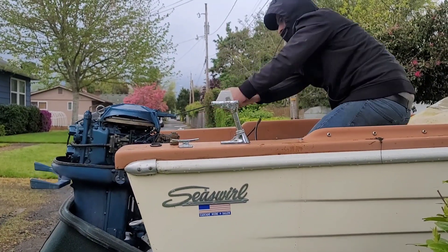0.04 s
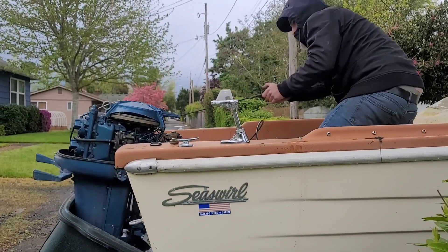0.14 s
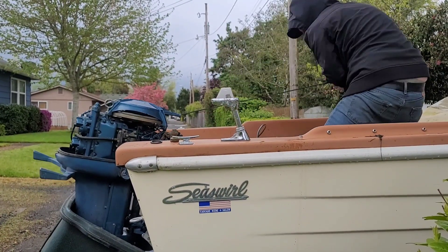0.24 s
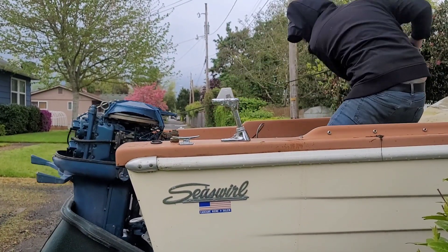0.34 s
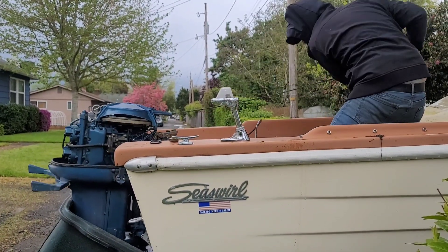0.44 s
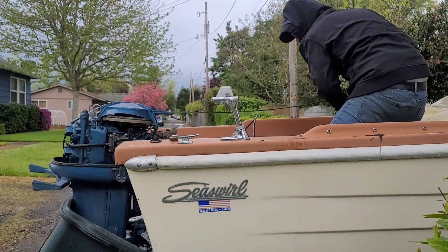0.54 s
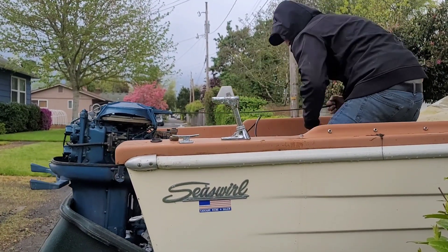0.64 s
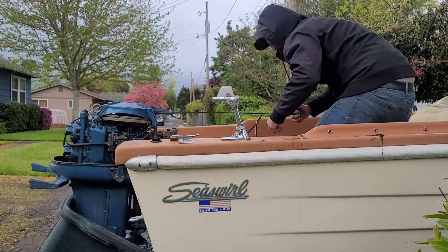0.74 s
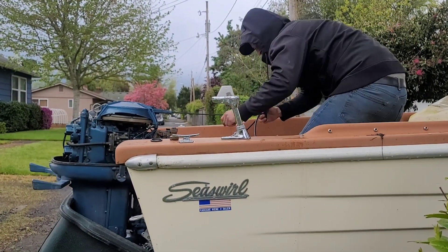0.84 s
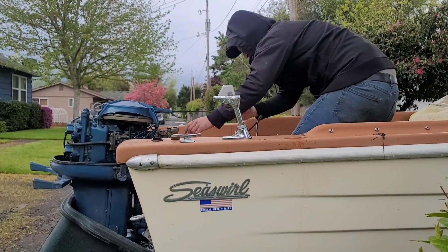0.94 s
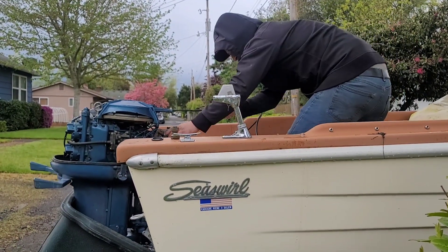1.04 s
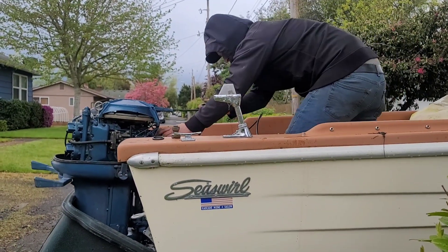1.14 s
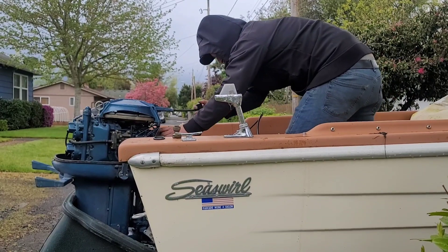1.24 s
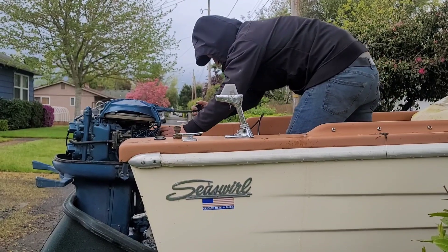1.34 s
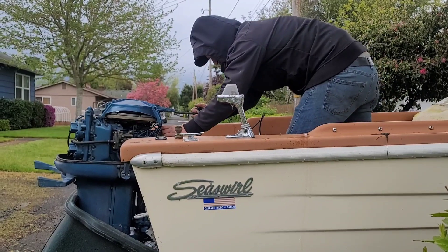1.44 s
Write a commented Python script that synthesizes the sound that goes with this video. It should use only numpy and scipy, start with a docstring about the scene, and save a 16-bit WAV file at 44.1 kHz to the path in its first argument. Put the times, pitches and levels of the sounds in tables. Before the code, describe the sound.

Faint bird chirps over a low outdoor hum open the moment. At about 0.2 s an outboard motor's starter cord is yanked: a harsh metallic rasp peaks near 0.28 s with a deep cylinder puff. Sharp clacks and hollow casing knocks follow as the cord winds back around 0.5 s, thinning to separate clacks at 0.72, 0.86 and 1.02 s. Light ticks and faint chirps remain until 1.5 s; it never fires.

```python
"""Faint bird chirps over a low hum in a quiet garden, then one starter-cord pull on an old outboard motor
that does not fire. The cord rasps out and winds back: dense random slips ringing the metal housing.
Metal clacks are noise bursts through that housing; clicks ring the hollow casing as knocks and rattle.
The cylinder gives one strong deep puff and weaker ones: swelling sines over low churning noise."""
import sys
import numpy as np
from scipy import signal
from scipy.fft import rfft, irfft, next_fast_len
from scipy.io import wavfile

SR = 44100
rng = np.random.default_rng(int(sys.argv[2]) if len(sys.argv) > 2 else 0)


def unload_audio(sound):
    """Save the sound as a 16-bit wav file, at the path given as the first command line argument."""
    columns = np.transpose(np.atleast_2d(sound))
    # keep every value between -1 and 1, then stretch to whole-number steps
    steps = np.round(np.clip(columns, -1, 1) * 32767)
    wavfile.write(sys.argv[1], SR, steps.astype(np.int16))


N = 66150
T = np.arange(N) / SR
SIZE = next_fast_len(N + SR // 2)
HZ = np.maximum(np.arange(SIZE // 2 + 1) * SR / SIZE, 1)


def from_db(db):
    """Decibels to gain."""
    return 10 ** (np.asarray(db) / 20)


def rms_one(x):
    """Scale to unit power."""
    return x / np.sqrt(np.mean(x ** 2) + 1e-20)


def level(rows):
    """Gain over time from (time_s, level_db) rows, silent outside them."""
    time_s, level_db = np.transpose(rows)
    return from_db(np.interp(T, time_s, level_db, left=-np.inf, right=-np.inf))


def at_hz(points):
    """Read (freq_hz, value) rows on a log-frequency axis."""
    freq_hz, value = np.transpose(points)
    return np.interp(np.log(HZ), np.log(freq_hz), value)


def shape(x, gain):
    """Apply a frequency response."""
    return irfft(rfft(x, SIZE) * gain, SIZE)[..., :N]


def drift(corner_hz):
    """Smooth random wander of rms 1, its amplitude spectrum halved at the corner."""
    return rms_one(shape(rng.standard_normal(N), 1 / (1 + (HZ / corner_hz) ** 2)))


# left-right correlation: [freq_hz, likeness (-1..1)], negative values count as 0
LEFT_RIGHT_LIKENESS = [(100, 0.7734), (700, -0.13), (1500, 0.36), (4000, 0.7), (12000, 0.62)]


def pair(white, colour_db):
    """Two unrelated signals become coloured stereo, its likeness set by frequency; rms 1."""
    alike = np.clip(at_hz(LEFT_RIGHT_LIKENESS), 0, 1)
    mid, side = shape(white, from_db(colour_db) * np.sqrt([1 + alike, 1 - alike]))
    return rms_one(np.array([mid + side, mid - side]))


def noise(colour_db):
    """Coloured stereo noise, rms 1."""
    return pair(rng.standard_normal((2, N)), colour_db)


def burst(start_s, rise_s, t60_s):
    """Straight rise, then exponential decay."""
    rise = np.clip((T - start_s) / rise_s, 0, 1)
    decay_time_s = np.maximum(T - start_s - rise_s, 0)
    return rise * from_db(-60 * decay_time_s / t60_s)


def tone_from(start_s, pitch_hz):
    """Sine with zero phase at its start."""
    return np.sin(2 * np.pi * pitch_hz * (T - start_s))


def ring(x, mode_hz, t60_s):
    """Two-pole resonator: a unit click rings a decaying sine of height 1."""
    r, w = from_db(-60 / (t60_s * SR)), 2 * np.pi * mode_hz / SR
    return signal.lfilter([0, np.sin(w)], [1, -2 * r * np.cos(w), r * r], x + 1e-18)


def grains(rate_per_s):
    """Two trains of tiny slips of uneven size, at shared random times."""
    hits = rng.random(N) < rate_per_s / SR
    size_db = 2 * np.minimum(rng.exponential(1, N), 4)
    return hits * from_db(size_db) * rng.standard_normal((2, N))


def from_left(x, lead_rad, balance_db):
    """Left leads right by a phase and differs in level (left minus right), mean power kept."""
    gains = from_db([balance_db / 2, -balance_db / 2])
    gains = gains / np.sqrt(np.mean(gains ** 2, axis=0))
    return shape(x, gains * np.exp(-1j * np.array([0 * lead_rad, lead_rad])))


def echoes(x, delay_s, t60_s):
    """Dense dying reflections, thin in the bass and different on each side."""
    response = rms_one(rng.standard_normal((2, N)) * burst(delay_s, delay_s, t60_s)) / np.sqrt(N)
    return shape(x, rfft(response, SIZE) * HZ / np.hypot(HZ, 900))


# far-off drone partials: [pitch_hz, level_db (rms)]
DRONE_PARTIALS = [(83, -49.5), (133, -55), (168, -57)]
# outdoor air spectrum: [freq_hz, density_db (relative, per Hz)]
AIR_SPECTRUM = [(15, -18), (30, -3.5), (65, 6.5), (100, 1.5), (160, -13.5), (230, -18), (370, -14),
                (500, -22.5), (780, -17.5), (1000, -31), (1500, -25), (2300, -33), (4000, -33.5),
                (5000, -47), (7500, -49), (9000, -58), (15000, -59)]
AIR_DB = -42.5


def garden():
    """Still outdoor air as coloured noise, with a far-off drone of sines wavering in pitch."""
    hum = 0
    for pitch_hz, level_db in DRONE_PARTIALS:
        wavering_hz = pitch_hz + 4 * drift(16)
        hum = hum + from_db(level_db) * np.sqrt(2) * np.sin(2 * np.pi * np.cumsum(wavering_hz) / SR)
    return hum + from_db(AIR_DB) * noise(at_hz(AIR_SPECTRUM))


# bird chirps: [start_s, length_s, level_db (relative), start_hz, middle_hz, end_hz]
BIRD_CHIRPS = [(0, .04, -60, 3100, 3170, 3050), (.032, .052, -57, 3750, 4000, 3980),
               (.085, .04, -51, 2350, 2600, 2900), (.113, .05, -45, 2800, 3000, 3100),
               (.134, .018, -48, 3400, 3520, 3400), (1.274, .038, -51, 2600, 3350, 3050),
               (1.305, .07, -57, 3000, 2950, 2950), (1.448, .06, -51, 3450, 4100, 4100)]
BIRD_DB, BIRD_FLUTTER_DB, BIRD_WARBLE_HZ = 0.5, 4, 49.7
BIRD_LEAD_S, BIRD_LEFT_DB = 0.0002, 5.5
BIRD_ECHO_DB, BIRD_ECHO_DELAY_S, BIRD_ECHO_T60_S = -14, 0.0033, 0.39


def birds():
    """Thin gliding whistles, fluttering in level and pitch, scattered by trees and houses."""
    song = 0
    for start_s, length_s, level_db, start_hz, middle_hz, end_hz in BIRD_CHIRPS:
        progress = np.clip((T - start_s) / length_s, 0, 1)
        pitch_hz = np.interp(progress, [0, .5, 1], [start_hz, middle_hz, end_hz])
        pitch_hz = pitch_hz + BIRD_WARBLE_HZ * drift(150)
        gain = from_db(level_db + BIRD_DB + BIRD_FLUTTER_DB * drift(90))
        arch = np.sqrt(np.abs(np.sin(np.pi * progress)))
        song = song + gain * arch * np.sin(2 * np.pi * np.cumsum(pitch_hz) / SR)
    direct = from_left(song, 2 * np.pi * HZ * BIRD_LEAD_S, np.full_like(HZ, BIRD_LEFT_DB))
    return direct + from_db(BIRD_ECHO_DB) * echoes(song, BIRD_ECHO_DELAY_S, BIRD_ECHO_T60_S)


# light ticks of the handle and cord: [start_s, level_db (relative), centre_hz]
HANDLE_TICKS = [(1.108, -36.5, 7700), (1.142, -38.5, 4450), (1.164, -40.5, 8400), (1.182, -43.5, 10900),
                (1.199, -40.5, 7400), (1.247, -47, 12000), (1.2247, -32, 2550), (1.227, -43.5, 5840),
                (1.274, -48, 3930), (1.281, -51, 9000), (1.318, -50, 12200), (1.343, -47, 6940),
                (1.3814, -32, 3100), (1.383, -50, 7960), (1.397, -69, 3180), (1.413, -49, 8100)]
TICK_RISE_S, TICK_T60_S, TICK_HALF_WIDTH_OCTAVES = 0.0013, 0.028, 0.54


def ticks():
    """Small dry noise bursts, each with its own spectral peak."""
    out = 0
    for start_s, level_db, centre_hz in HANDLE_TICKS:
        distance = np.log2(HZ / centre_hz) / TICK_HALF_WIDTH_OCTAVES
        tick = noise(-20 * np.log10(1 + distance ** 2))
        out = out + from_db(level_db) * burst(start_s, TICK_RISE_S, TICK_T60_S) * tick
    return out


# churning of the turning motor: [time_s, level_db (relative)]
CHURN_LEVEL = [(.12, -82), (.18, -51), (.23, -39), (.265, -26), (.335, -23), (.41, -34), (.452, -22.5),
               (.49, -33.5), (.56, -26.5), (.63, -31), (.74, -33), (.9, -40.5), (1.1, -65), (1.4, -60.5)]
# its spectrum: [freq_hz, density_db (relative, per Hz)]
CHURN_SPECTRUM = [(20, -1), (40, -9), (70, 6.5), (115, -0.5), (160, 0), (205, -6), (260, 3), (335, 2),
                  (410, -4), (520, -17), (900, -11), (3000, -62)]
# puffs of the cylinder: [start_s, level_db (relative), pitch_hz, rise_s, t60_s]
CYLINDER_PUFFS = [(0.281, -4, 80, .020, 0.052), (.328, -11.5, 77.6, 0.018, 0.04),
                  (0.495, -20.5, 71, 0.017, 0.058), (0.551, -21, 122.5, 0.0089, 0.036),
                  (0.661, -21, 59, 0.018, .12), (0.783, -27, 79, 0.016, 0.21),
                  (.92, -30, 71.3, 0.013, 0.083)]


def cylinder():
    """Deep puffs of pumped air, as swelling and dying sines, over low churning noise."""
    puffs = 0
    for start_s, level_db, pitch_hz, rise_s, t60_s in CYLINDER_PUFFS:
        puff = burst(start_s, rise_s, t60_s) * tone_from(start_s, pitch_hz)
        puffs = puffs + from_db(level_db) * puff
    return puffs + level(CHURN_LEVEL) * noise(at_hz(CHURN_SPECTRUM))


# modes of the hollow casing: [mode_hz, level_db (relative), t60_s]
CASING_MODES = [(597.5, -14, 0.16), (631, -5, 0.096), (668, -4.5, 0.054), (720.7, 0, 0.066),
                (753, -4.5, 0.053), (793.6, -2.5, 0.058), (855, -16, 0.047), (1134, -8, 0.065),
                (1320, -5, 0.024), (1600, 0, 0.035)]
# loose rattle: [time_s, level_db (relative)]
RATTLE_LEVEL = [(.17, -47.5), (.21, -24.5), (.28, -26), (.40, -20), (.5, -28), (.54, -31.5), (.63, -34.5),
                (.675, -27.5), (.71, -34.5), (.76, -30), (.95, -35.5), (1.08, -42), (1.14, -56.5),
                (1.3, -72.5)]
# knocks of the rocking motor: [start_s, level_db (relative), strongest_pitch_hz]
MOTOR_KNOCKS = [(.061, -37.5, 715), (.098, -46, 806), (.198, -24, 730), (.215, -14.5, 732),
                (.228, -8.5, 730), (.250, -8, 728), (.310, -28, 690), (.343, -14.5, 720), (.361, -12, 730),
                (.384, -8.5, 717), (.400, -13, 685), (.420, -12, 697), (.436, -39, 700), (.451, -13, 695),
                (.547, -17.5, 651), (.593, -19, 697), (.606, -44, 710), (.6465, -17.5, 651),
                (.724, -18, 773), (.746, -14, 669), (.770, -31, 716), (.797, -17.5, 740), (.848, -35, 700),
                (.862, -20, 747), (.926, -13.5, 743), (.965, -20.5, 758), (1.028, -12, 661.5),
                (1.088, -26.5, 710), (1.151, -29, 754), (1.176, -36.5, 740)]
KNOCK_DB, KNOCK_SPREAD_DB, KNOCK_BASE, KNOCK_WIDTH_HZ = -5, 3, 0.45, 79
CONTACT_DB, CONTACT_RISE_S, CONTACT_T60_S = -5, .004, 0.045
RATTLE_RATE_PER_S = 600


def casing():
    """Knocks and rattle ring the hollow casing; each knock favours modes near its own pitch."""
    start_s, level_db, pitch_hz = np.transpose(MOTOR_KNOCKS)
    knocks, rattle = 0, 0
    for k, (mode_hz, mode_db, t60_s) in enumerate(CASING_MODES):
        favour = KNOCK_BASE + np.exp(-((mode_hz - pitch_hz) / KNOCK_WIDTH_HZ) ** 2)
        spread_db = KNOCK_SPREAD_DB * rng.standard_normal(len(start_s))
        clicks = np.zeros(N)
        clicks[(start_s * SR).astype(int)] = favour * from_db(level_db + KNOCK_DB + mode_db + spread_db)
        polarity = (-1) ** (k // 2)
        knocks = knocks + polarity * ring(clicks, mode_hz, t60_s)
        rattle = rattle + from_db(mode_db) * ring(grains(RATTLE_RATE_PER_S)[0], mode_hz, t60_s)
    contact = 0   # the dull, quickly damped part of a knock
    for knock_s, knock_db, knock_hz in MOTOR_KNOCKS:
        thud = burst(knock_s, CONTACT_RISE_S, CONTACT_T60_S) * tone_from(knock_s, knock_hz)
        contact = contact + from_db(knock_db + CONTACT_DB) * thud
    return knocks + contact + level(RATTLE_LEVEL) * rms_one(rattle)


# modes of the starter's metal housing: [mode_hz, width_hz, level_db (relative)]
HOUSING_MODES = [(1072, 17, -1), (1572, 100, -2), (1796, 21, -4.5), (2212, 90, 3), (2807, 177, -1.5),
                 (3360, 50, -12), (3873, 30, -4.5), (4143, 28, 1.5), (4400, 67, -5.5), (4860, 41, -0.5),
                 (5630, 12, -28.5), (6210, 177, 0), (6690, 140, -11.5), (7750, 210, -3.5)]


def housing(x, ring_db):
    """Contact noise plus the housing's ringing: parallel bandpass resonators."""
    out = x
    for mode_hz, width_hz, level_db in HOUSING_MODES:
        r = np.exp(-np.pi * width_hz / SR)
        feed = np.array([1, 0, -1]) * (1 - r * r) / 2
        feedback = [1, -2 * r * np.cos(2 * np.pi * mode_hz / SR), r * r]
        out = out + from_db(level_db + ring_db) * signal.lfilter(feed, feedback, x)
    return out


GRAINS_PER_S = 14000
RASP_FLICKER_DB, FLICKER_CORNER_HZ = 0.96, 88
RASP_PATCH_DB, PATCH_CORNER_HZ = 3.5, 71


def cord(curve, spectrum, gain_db, ring_db):
    """The cord rubs through its guide in dense slips, which clump differently in each band."""
    slips, rasp = pair(grains(GRAINS_PER_S), at_hz(spectrum)), 0
    centres = np.log(np.geomspace(1000, 13000, 8))
    for band in np.eye(len(centres)):
        band_slips = shape(slips, np.interp(np.log(HZ), centres, band))
        rasp = rasp + band_slips * from_db(RASP_PATCH_DB * drift(PATCH_CORNER_HZ))
    flicker = from_db(gain_db + RASP_FLICKER_DB * drift(FLICKER_CORNER_HZ))
    return housing(rms_one(rasp) * level(curve) * flicker, ring_db)


# cord winding back: [time_s, level_db (relative)]
REWIND_LEVEL = [(.39, -64), (.45, -28), (.492, -22), (.52, -29.5), (.555, -41), (.63, -44), (.71, -43.5),
                (.77, -39), (.84, -45.5), (.90, -38), (1.0, -53.5), (1.08, -41.5), (1.19, -54.5),
                (1.3, -61.5), (1.42, -63.5), (1.5, -73)]
# its spectrum: [freq_hz, density_db (relative, per Hz)]
REWIND_SPECTRUM = [(300, -8), (800, -22), (1500, 2), (2300, -2), (2900, 6.5), (4600, -6), (6800, -4.5),
                   (8000, -9.5), (12000, -11.5), (14500, -9)]


def cord_rewind():
    """The cord winds back, rubbing with weaker ringing of the housing."""
    return cord(REWIND_LEVEL, REWIND_SPECTRUM, gain_db=-0.5, ring_db=-4.5)


# cord running out: [time_s, level_db (relative)]
PULL_LEVEL = [(.17, -54), (.205, -31), (.225, -16.5), (.245, -36), (.265, -14), (.283, -4), (.295, -14.5),
              (.32, -25.5), (.345, -25), (.372, -20), (.44, -30), (.55, -60)]
# its spectrum: [freq_hz, density_db (relative, per Hz)]
PULL_SPECTRUM = [(250, -2.5), (700, -8.5), (1400, 6.5), (2200, -4.5), (3200, 5.5), (5000, -1.5),
                 (6700, -1.5), (8500, -16.5), (11000, -12), (15000, -8.5)]


def cord_pull():
    """The cord rasps out, rubbing with stronger ringing of the housing."""
    return cord(PULL_LEVEL, PULL_SPECTRUM, gain_db=-3.5, ring_db=3)


# clack spectrum before tilt: [freq_hz, density_db (relative, per Hz)]
CLACK_SPECTRUM = [(100, -44), (350, -43), (700, -3), (1400, 4), (2200, -5), (3200, 1.5), (5000, -9),
                  (6800, 1), (9000, -10), (12000, -13), (15000, -8.5)]
# metal clacks of the starter: [start_s, level_db (relative), tilt_db_per_octave above 1 kHz, rise_s, t60_s]
STARTER_CLACKS = [(.1828, -26.5, -2.5, 0.0043, .055), (.201, -27, -3, 0.0014, 0.053),
                  (0.2124, -13.5, -3.5, 0.0013, 0.095), (.354, -7, -0.5, 0.00089, 0.1),
                  (0.413, -15, -0.5, 0.0033, 0.11), (0.445, -18.5, 2.5, 0.0047, 0.085),
                  (0.59, -18.5, -2, 0.0084, 0.046), (.651, -26, -4, 0.0017, 0.12),
                  (0.67, -24, -6.5, .003, 0.035), (0.7201, -9.5, 0, 0.0023, 0.033),
                  (0.786, -27.5, -2.5, 0.00073, 0.051), (0.8599, -10.5, 1.5, 0.0013, 0.024),
                  (0.925, -28.5, -7, 0.0038, .04), (0.966, -22, -9, 0.0013, 0.06),
                  (1.0239, -10.5, 1, .001, 0.025)]
CLACK_DB, CLACK_RING_DB = -5, 1.5
CRACK_DB, CRACK_T60_S = -1.5, 0.031
CRASH_DB = -5.5
TAIL_DB, TAIL_T60_S = -15, 0.14


def clacks():
    """Each clack is a snap, a crash of metal and a faint tail, rung through the housing."""
    out, octaves = 0, np.log2(np.maximum(HZ, 1000) / 4000)
    for start_s, level_db, tilt_db, rise_s, t60_s in STARTER_CLACKS:
        stages = (CRACK_DB, CRACK_T60_S), (CRASH_DB, t60_s), (TAIL_DB, TAIL_T60_S)
        power = 0
        for stage_db, decay_s in stages:
            power = power + (from_db(stage_db) * burst(start_s, rise_s, decay_s)) ** 2
        metal = noise(at_hz(CLACK_SPECTRUM) + tilt_db * octaves)
        out = out + from_db(level_db + CLACK_DB) * np.sqrt(power) * metal
    return housing(out, CLACK_RING_DB)


# phase by which the motor's left signal leads: [freq_hz, lead_rad]
MOTOR_LEAD = [(0, 0), (1980, 3), (3010, 2.5), (3880, 5), (5680, 4), (6720, 6.5), (7670, 4.5), (8610, 13.5),
              (9300, 14.5), (10400, 26.5), (10800, 26), (16400, 22)]
# motor level, left minus right: [freq_hz, balance_db]
MOTOR_BALANCE = [(80, -2.5), (300, 1.5), (720, 6.5), (1400, 2), (2800, 2.5), (6000, 3.5), (9500, 8.5),
                 (14000, -1)]
HULL_DB, HULL_DELAY_S, HULL_T60_S = -5.5, 0.00085, 0.096


def motor():
    """All motor parts with reflections from the boat and the ground, a little to the left."""
    dry_motor = cord_pull() + cord_rewind() + clacks() + ticks() + casing() + cylinder()
    reflected = dry_motor + from_db(HULL_DB) * echoes(dry_motor, HULL_DELAY_S, HULL_T60_S)
    lead_rad = np.interp(HZ, *np.transpose(MOTOR_LEAD))
    return from_left(reflected, lead_rad, at_hz(MOTOR_BALANCE))


def scene():
    """The motor in front, with birds and the garden all round."""
    return motor() + birds() + garden()


CEILING, CUTOFF_HZ = .88, 15800


def record(dry):
    """The highest peaks are rounded off, the top is cut."""
    rounded = dry / (1 + (dry / CEILING) ** 8) ** (1 / 8)
    lowpass = signal.ellip(12, .1, 80, CUTOFF_HZ, fs=SR, output="sos")
    return signal.sosfilt(lowpass, rounded)


dry = scene()
out = record(dry)
unload_audio(out)
```